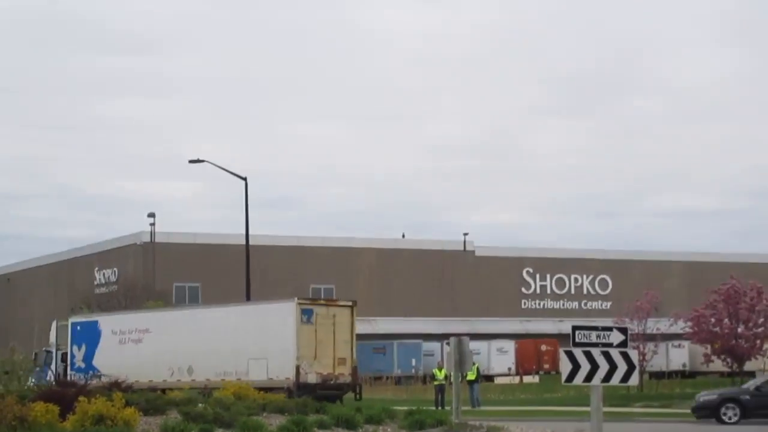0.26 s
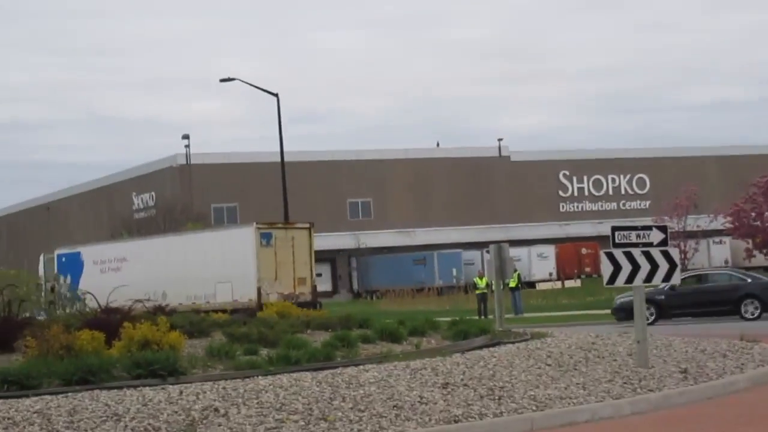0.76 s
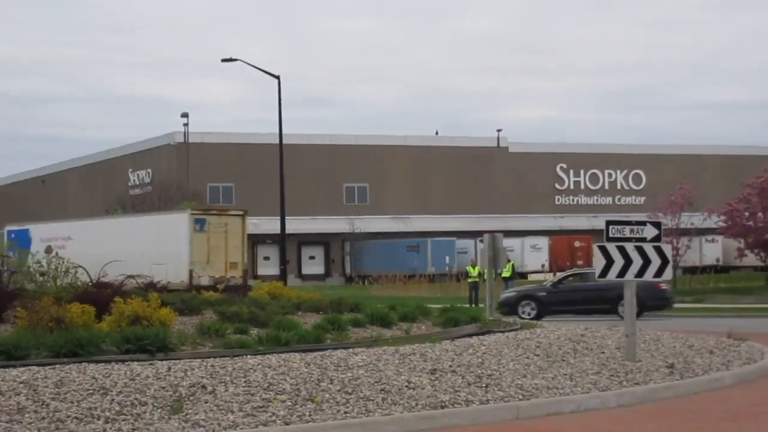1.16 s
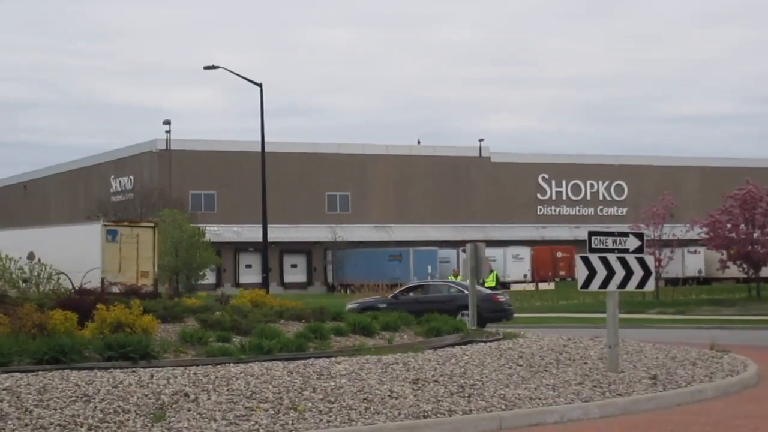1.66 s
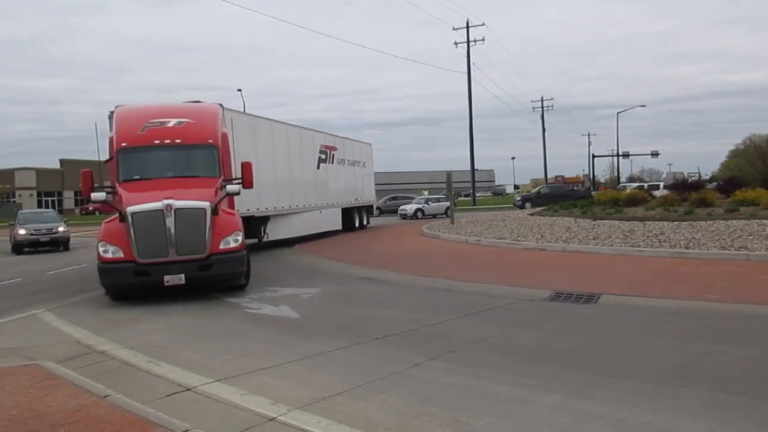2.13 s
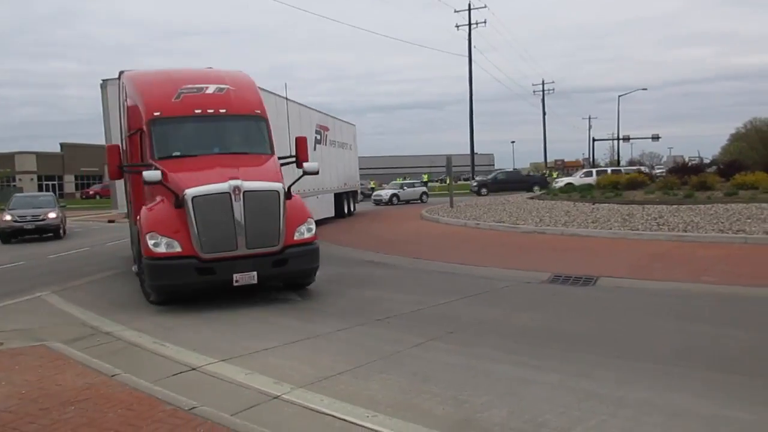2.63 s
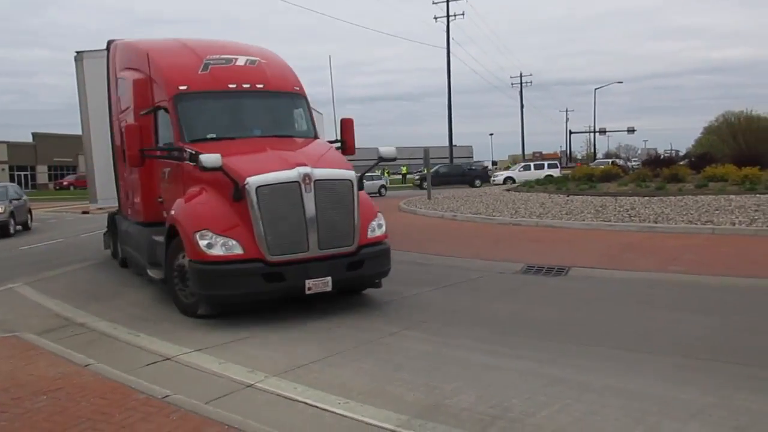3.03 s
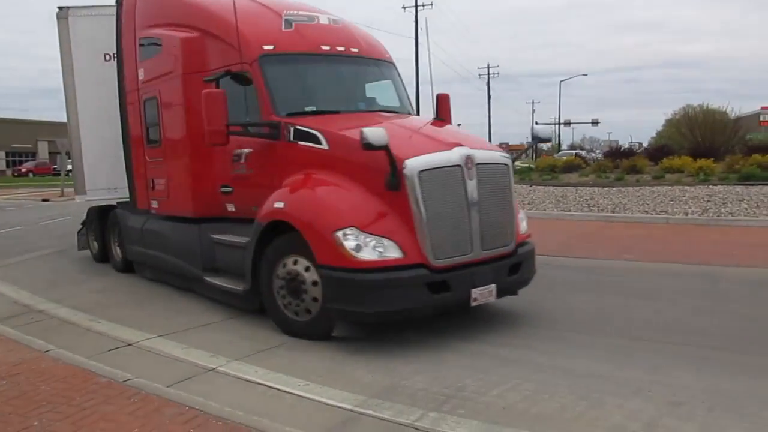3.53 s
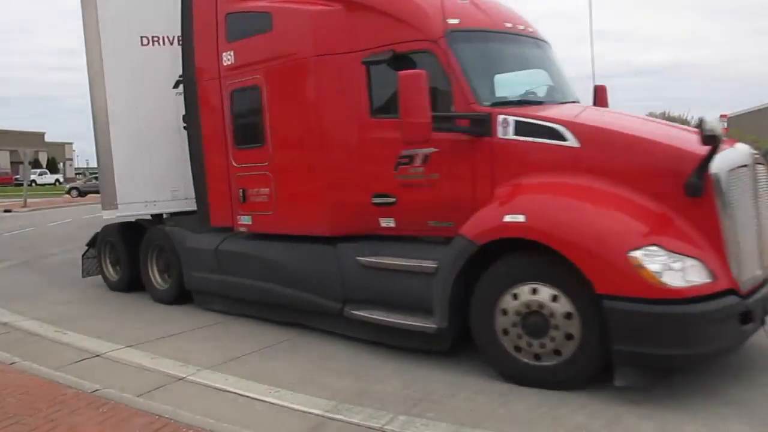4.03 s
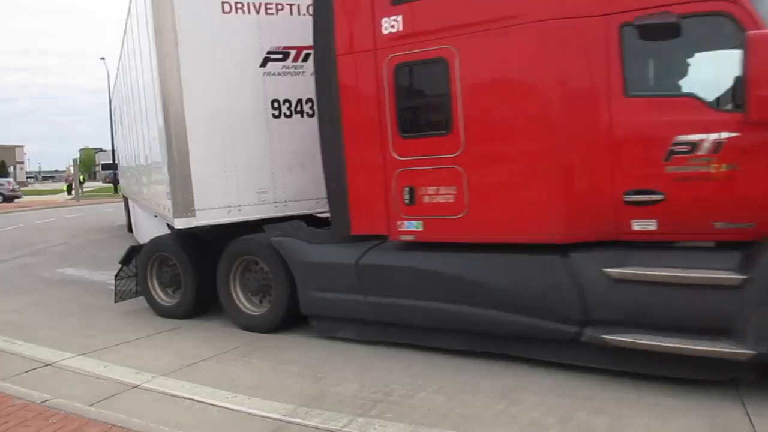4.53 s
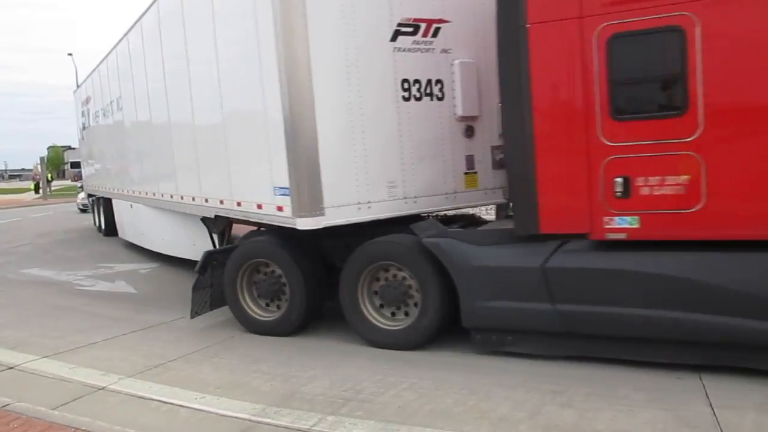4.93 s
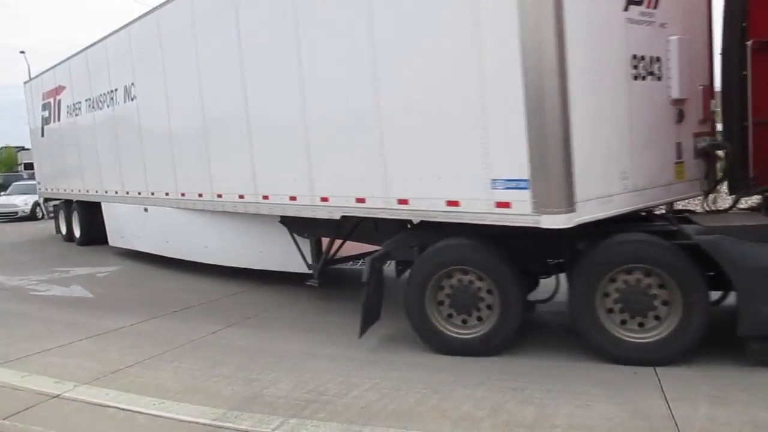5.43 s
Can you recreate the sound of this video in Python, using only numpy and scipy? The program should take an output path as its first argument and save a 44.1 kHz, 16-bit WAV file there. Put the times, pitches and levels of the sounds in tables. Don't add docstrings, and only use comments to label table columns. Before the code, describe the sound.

A handheld microphone by the road first picks up soft, low traffic, dry taps on its casing, a faint lorry pulling away and a run of panel knocks. The sound drops out briefly, then jumps to a near semi truck: pulsing diesel drone slowly sagging in pitch, gear whine, rough tyre noise, a squeak and hissing air valves, with levels dipping after loud peaks.

```python
import sys
import numpy as np
from scipy import signal
from scipy.fft import rfft, irfft, next_fast_len
from scipy.io import wavfile
from scipy.ndimage import uniform_filter1d, map_coordinates

SR = 44100
rng = np.random.default_rng(int(sys.argv[2]) if len(sys.argv) > 2 else 0)


def pcm_store(signal):
    levels = np.round(np.clip(np.atleast_2d(signal), -1, 1) * 32767)
    wavfile.write(sys.argv[1], SR, levels.astype(np.int16).T)


def invert_db(x):
    u = np.asarray(x, float) / 20
    return 10 ** u


N = 250607


def clock():
    return np.arange(N) / SR


def unit(x):
    return x / np.sqrt(np.mean(x ** 2) + 1e-20)


def curves(rows):
    s, *columns = np.transpose(rows)
    return [np.interp(clock(), s, column) for column in columns]


def wobble(rate_hz):
    knots = rng.standard_normal(int(N * rate_hz / SR) + 4)
    return map_coordinates(knots, [np.arange(N) * rate_hz / SR])


def swell(db, peak_s, span_s):
    return db - 6 * ((clock() - peak_s) / span_s) ** 2


def rush(spectrum, patchy_db):
    z = signal.stft(rng.standard_normal(N + 512), nperseg=512)[2]
    patches = uniform_filter1d(rng.standard_normal(z.shape), 6, 0)
    patches = unit(uniform_filter1d(patches, 10, 1))
    white = signal.istft(z * invert_db(patchy_db * patches), nperseg=512)[1][:N]
    size = next_fast_len(N)
    hz, db = np.transpose(spectrum)
    grid_hz = np.fft.rfftfreq(size, 1 / SR)
    colour = invert_db(np.interp(np.log(grid_hz + 1), np.log(hz + 1), db))
    return unit(irfft(rfft(white, size) * colour, size)[:N])


def tone(hz, db, drift_rad, flutter_db):
    phase = 2 * np.pi * np.cumsum(hz) / SR + drift_rad * wobble(9)
    return np.sqrt(2) * invert_db(db + flutter_db * wobble(7.7)) * np.sin(phase)


def whistle(hz, db, width_hz):
    phase = 2 * np.pi * np.cumsum(hz) / SR
    return invert_db(db) * unit(wobble(width_hz) * np.sin(phase) + wobble(width_hz) * np.cos(phase))


def add(track, s, burst):
    part = track[round(s * SR):][:len(burst)]
    part += burst[:len(part)]


def firing_rate():
    firing_hz, sag_hz_per_s = 50.58, 1.97
    return firing_hz - sag_hz_per_s * (clock() - 2.11)


# (time [s], level [dB])
TRACTOR_CLOSENESS = [(2.12, -10), (2.27, -9), (2.47, -4), (2.65, -3), (2.92, 0.3), (3.15, -.3), (3.4, .8),
                     (3.52, -0.8), (3.69, 0), (3.95, -0.3), (4.2, 0), (4.38, 0.6), (4.7, 1.5), (4.9, 0),
                     (5.15, -1.5), (5.4, -2), (5.68, -2)]


def tractor_closeness_db():
    return curves(TRACTOR_CLOSENESS)[0]


# (time [s], share heard from behind the engine bay [0-1])
PASSING = [
    (3.8, 0.06),
    (4.3, 0.62),
    (4.8, 0.77),
    (5.3, 0.92),
]


def behind_share():
    return curves(PASSING)[0]


def front_to_rear(front, rear, behind):
    return np.sqrt(1 - behind) * front + np.sqrt(behind) * rear


def firing_beat_db():
    firing = 2 * np.pi * np.cumsum(firing_rate()) / SR
    steady = 0.46 * np.cos(firing) + 0.22 * np.cos(firing / 3)
    return steady + 0.85 * wobble(90) + 0.31 * wobble(15)


# (frequency [Hz], level per Hz [dB])
CLATTER_FRONT = [(760, -16.5), (1300, -10.5), (1510, -0.5), (1630, -4.5), (2120, -3.5), (2550, -7.5),
                 (3200, -4), (4230, -12), (5890, -12.5), (7500, -39), (9750, -41), (16500, -120)]
CLATTER_REAR = [(760, -8.5), (1300, -4.5), (1550, -1), (2020, 1.5), (2160, -0.5), (2550, -6), (2980, -7.5),
                (3470, -8.5), (4520, -14.5), (5630, -13.5), (7500, -26.5), (9750, -49), (16500, -120)]


def clatter(behind):
    direct = rush(CLATTER_FRONT, patchy_db=1.5)
    second_peak_hz = 3270 + 250 * behind
    late = np.arange(N) - 3 / 2 * SR / second_peak_hz
    front = unit(direct - 0.078 * map_coordinates(direct, [late]))
    return front_to_rear(front, rush(CLATTER_REAR, patchy_db=0.6), behind)


# (frequency [Hz], level per Hz [dB])
ROAR_FRONT = [(210, -31), (350, -4.5), (677, -0.5), (767, 0), (859, -2), (1120, -1.5), (1380, -8.5),
              (1450, -11.5), (1880, -42), (3190, -120)]
ROAR_REAR = [(210, -21), (350, -13), (404, -5), (584, -3), (673, -1), (805, -5), (991, 0.5), (1350, -6),
             (1450, -13), (1880, -39), (3190, -120)]


def tyre_roar(behind):
    return front_to_rear(rush(ROAR_FRONT, patchy_db=0.54), rush(ROAR_REAR, patchy_db=0.8), behind)


# (frequency [Hz], level per Hz [dB])
HISS_FRONT = [(3820, -27), (6500, -1), (10600, -11), (11600, -11.5), (12500, -14), (13600, -14.5),
              (15000, -22.5)]
HISS_REAR = [(3820, -22), (6500, 0), (7020, -0.5), (8130, -3.5), (10900, -10.5), (15000, -23.5)]


def tyre_hiss(behind):
    return front_to_rear(rush(HISS_FRONT, patchy_db=0.3), rush(HISS_REAR, patchy_db=2.0), behind)


# (frequency [Hz], level per Hz [dB])
BODY_RUMBLE = [(12, -44), (30, -16), (45, -6.5), (65, -6), (100, -0.5), (146, -3), (190, -11), (250, -20),
               (420, -120)]
BODY_DRUM = [(88, -20), (150, -7), (199, -4), (252, -1.5), (319, -5), (403, -13), (450, -14), (580, -42),
             (990, -120)]


def body_boom(rumble_db, drum_db):
    rumble = invert_db(rumble_db - 1.0 + 0.54 * wobble(25)) * rush(BODY_RUMBLE, patchy_db=1.0)
    return rumble + invert_db(drum_db - 0.5 + 0.35 * wobble(25)) * rush(BODY_DRUM, patchy_db=2.0)


# (level [dB], growth per dB of closeness [dB], extra from behind [dB])
TRACTOR_LAYERS = [
    (-46.5, 1, 1.5),
    (-47.5, 0.9, 3.3),
    (-39, 0.9, -0.64),
    (-40.5, 1.1, 0.4),
    (-56.5, 1.4, 0),
]


def tractor_noise():
    behind, beat_db, close_db = behind_share(), firing_beat_db(), tractor_closeness_db()
    rumble_db, drum_db, roar_db, clatter_db, hiss_db = (
        db + growth * close_db + rear_db * behind for db, growth, rear_db in TRACTOR_LAYERS)
    noise = body_boom(rumble_db, drum_db)
    noise += invert_db(roar_db - 2.5) * unit(invert_db(0.85 * beat_db) * tyre_roar(behind))
    noise += invert_db(hiss_db - 0.5) * unit(invert_db(1.05 * beat_db) * tyre_hiss(behind))
    noise += invert_db(clatter_db - 2.5) * unit(invert_db(beat_db) * clatter(behind))
    return noise


# (multiple of firing rate, peak level [dB], loudest at [s], 6 dB down after [s])
ENGINE_ORDERS = [
    (1, -49.5, 3.53, 1.2),
    (2.7, -53.5, 3.4, 1.05),
    (3, -49, 3.7, 0.9),
    (5.5, -46, 4.44, 0.3),
    (7, -49, 4.27, 0.8),
]


def firing_orders():
    firing_hz = firing_rate()
    orders = np.zeros(N)
    for k, *peak in ENGINE_ORDERS:
        db = swell(*peak) - 2.0 * np.log(k)
        orders += tone(k * firing_hz, db, drift_rad=0.31 * k ** 0.98, flutter_db=2.0)
    return orders


def exhaust_throb():
    t = clock()
    beat_hz, beat_peak_s, depth = 5.92, 2.36, 0.8
    beat = (1 + depth * np.cos(2 * np.pi * beat_hz * (t - beat_peak_s))) / (1 + depth)
    db = swell(-39.5, peak_s=2.55, span_s=1.96) + 0.7 * tractor_closeness_db()
    db -= 60 * np.maximum(t - 4.1, 0)
    return beat * tone(2 * firing_rate(), db - 2.5, drift_rad=0.5, flutter_db=1.7)


def gear_whine():
    mesh_hz = 1587.2 - 73 * (clock() - 2.11)
    return tone(mesh_hz, swell(-52.5, peak_s=3.45, span_s=0.95), drift_rad=0.23, flutter_db=1.4)


# (time [s], pitch [Hz], level [dB])
VALVE_WHISTLE = [
    (4.35, 3250, -72),
    (4.55, 3274, -58),
    (4.95, 3400, -53),
    (5.22, 3577, -51.5),
    (5.33, 3596, -57),
    (5.69, 3624, -57),
]
VALVE_PUFF = [
    (5.3, 7000, -85),
    (5.36, 7000, -60),
    (5.43, 7100, -60),
    (5.5, 7200, -85),
]
SQUEAK = [
    (4.3, 4270, -80),
    (4.45, 4216, -62),
    (4.7, 4200, -59),
    (4.82, 4150, -62),
    (4.92, 4126, -78),
]


def air_valves():
    air = invert_db(3.7 * wobble(18)) * whistle(*curves(VALVE_WHISTLE), width_hz=360)
    air += whistle(*curves(VALVE_PUFF), width_hz=1100)
    return air + whistle(*curves(SQUEAK), width_hz=170)


def burst_clock():
    return np.arange(SR // 20) / SR


# (time [s], peak level [dB], pitch [Hz])
THUMPS = [
    (5.185, -24, 175),
    (5.228, -29, 200),
]


def axle_thumps():
    track, t = np.zeros(N), burst_clock()
    half_s = t[-1] / 2
    u = t - half_s
    for s, db, hz in THUMPS:
        push = np.cos(2 * np.pi * hz * u) * np.exp(-(u * hz / 0.6) ** 2)
        add(track, s - half_s, -invert_db(db) * push)
    return track


# (time [s], peak level [dB], pitch [Hz])
KNOCKS = [
    (0.204, -32, 773),
    (1.269, -28, 920),
    (1.35, -27.5, 720),
    (1.414, -38, 727),
    (1.603, -25.5, 782),
    (1.654, -25.5, 820),
    (1.726, -30, 812),
    (4.73, -24, 990),
    (5.495, -29, 1150),
]


def trailer_knocks():
    track, t = np.zeros(N), burst_clock()
    for s, db, hz in KNOCKS:
        panel = np.sin(2 * np.pi * hz * t)
        panel += 0.54 * np.sin(2 * np.pi * 1.8 * hz * t) * invert_db(-60 * t / 0.011)
        contact = unit(np.convolve(rng.standard_normal(len(t)), np.hanning(24), "same"))
        panel += 0.45 * invert_db(-60 * t / 0.012) * contact
        add(track, s, invert_db(db - 4 - 60 * t / 0.028) * panel * (1 - np.exp(-t / 0.0004)))
    return track


# (time [s], peak level [dB], pitch [Hz], t60 [s], broad snap share [0-1])
TICKS = [
    (.127, -35.5, 7220, 0.014, 0.4),
    (.343, -51, 10950, .015, 0.59),
    (.511, -25, 10000, .0016, 0.65),
    (.529, -41, 9000, .008, .7),
    (.555, -35.5, 4000, 0.011, .75),
    (.592, -40, 11050, .003, 0.8),
    (2.322, -43.5, 14000, 0.0022, .2),
]


def finger_ticks():
    track, t = np.zeros(N), burst_clock()
    for s, db, hz, t60_s, snap in TICKS:
        rattle = np.sin(2 * np.pi * hz * t + np.cumsum(rng.normal(0, 0.25, len(t))))
        crack = (1 - snap) * rattle + snap * uniform_filter1d(rng.standard_normal(len(t)), size=3)
        add(track, s, invert_db(db - 60 * t / t60_s) * (1 - np.exp(-t / t60_s * 40)) * crack)
    return track


# (time [s], base rate [Hz])
LORRY_RATE = [
    (0, 34.4),
    (.45, 34.5),
    (.95, 37.97),
    (1.1, 38.8),
    (1.25, 36.4),
]
# (multiple of base rate, peak level [dB], loudest at [s], 6 dB down after [s])
LORRY_ORDERS = [
    (2, -57, .5, 3),
    (3, -48.5, 0.6, 2),
    (4, -53, 1, 0.03),
    (8, -53.5, 1.16, .5),
]
# (time [s], pitch [Hz], level [dB])
LORRY_HUM = [
    (0, 228, -58),
    (.35, 229, -57),
    (.6, 236, -64),
    (.8, 238, -80),
]


def far_lorry():
    rate_hz, = curves(LORRY_RATE)
    off_db = 150.5 * np.maximum(clock() - 1.1, 0)
    orders = sum(tone(k * rate_hz, swell(*peak) - off_db, drift_rad=0.3, flutter_db=1.5)
                 for k, *peak in LORRY_ORDERS)
    return orders + whistle(*curves(LORRY_HUM), width_hz=14)


# (time [s], pitch [Hz], level [dB])
CAR_HUM = [
    (1.3, 150.3, -79),
    (1.5, 146.7, -51),
    (1.7, 146.4, -46),
    (1.92, 150.3, -52.5),
]


def far_car():
    return whistle(*curves(CAR_HUM), width_hz=25)


# (time [s], level [dB])
TRAFFIC_CLOSENESS = [
    (0, -1),
    (.3, -1),
    (.6, -1.5),
    (1.2, -3.5),
    (1.45, -2.5),
    (1.75, -.5),
    (1.9, 1),
]
# (time [s], share [0-1])
CAR_JOINS = [
    (1.3, 0.1),
    (1.9, 1),
]
# (level [dB], growth per dB of closeness [dB], added by joining car [dB])
TRAFFIC_LAYERS = [
    (-42.5, -0.2, 3.5),
    (-47, -0.2, 2),
    (-52.5, 1.4, -0.5),
]
# (frequency [Hz], level per Hz [dB])
TRAFFIC_RUMBLE = [(12, -46.5), (20, -18.5), (76, -2), (102, -1.5), (183, -3), (244, -3.5), (312, -7.5),
                  (356, -14.5), (400, -13), (450, -15), (580, -49), (990, -120)]
TRAFFIC_ROAR = [(210, -34), (350, -2.5), (388, -7), (562, -5), (828, -2), (1140, -8), (1380, -8),
                (2000, -15.5), (2600, -31), (4400, -120)]
TRAFFIC_HISS = [(940, -35), (1600, -7), (2250, -7.5), (2550, -9), (2770, -8), (4800, -14.5), (5750, -18.5),
                (9060, -25.5), (9870, -28.5), (13600, -38.5), (15400, -44)]


def far_traffic():
    close_db, = curves(TRAFFIC_CLOSENESS)
    joined, = curves(CAR_JOINS)
    rumble_db, roar_db, hiss_db = (
        db + growth * close_db + car_db * joined for db, growth, car_db in TRAFFIC_LAYERS)
    rumble_db = rumble_db - 3.0 + 0.5 * wobble(25) + 0.4 * wobble(5.5)
    roar_db = roar_db + 1.1 * wobble(30.15) + 0.35 * wobble(5.5)
    hiss_db = hiss_db + 0.43 * wobble(40)
    noise = invert_db(rumble_db) * rush(TRAFFIC_RUMBLE, patchy_db=-0.5)
    noise += invert_db(roar_db) * rush(TRAFFIC_ROAR, patchy_db=-0.9)
    return noise + invert_db(hiss_db) * rush(TRAFFIC_HISS, patchy_db=0.8)


def scene():
    tractor = tractor_noise() + firing_orders() + exhaust_throb() + gear_whine() + air_valves()
    roundabout = far_traffic() + far_lorry() + far_car()
    bumps = axle_thumps() + trailer_knocks() + finger_ticks()
    return (np.where(clock() > 2, tractor, roundabout) + bumps)[None]


DUCK_S = [3.715, 4.41, 5.19]
DUCK_DB = [2, 2, 4.5]


def ducking_db():
    attack_s, recover_s = 0.011, 0.24
    since_s = np.maximum(clock() - np.array(DUCK_S)[:, None], 0)
    return -np.dot(DUCK_DB, np.minimum(since_s / attack_s, 1) * np.exp(-since_s / recover_s))


def band_limit(x):
    size = next_fast_len(N)
    gain = np.where(np.fft.rfftfreq(size, 1 / SR) < 15010, 1, invert_db(-19.0))
    return irfft(rfft(x, size) * gain, size)[:, :N]


def roll_off(x):
    return signal.sosfilt(signal.butter(12, 15560, fs=SR, output="sos"), x)


# (time [s], gain [dB])
SCENE_CHANGE = [
    (1.911, 1.5),
    (1.926, -70),
    (1.943, -68),
    (1.945, -120),
    (2.108, -120),
    (2.1135, 3),
]


def record(dry):
    change_db, = curves(SCENE_CHANGE)
    mix = band_limit(dry) * invert_db(change_db + ducking_db())
    return roll_off(mix)


dry = scene()
out = record(dry)
pcm_store(out)
```